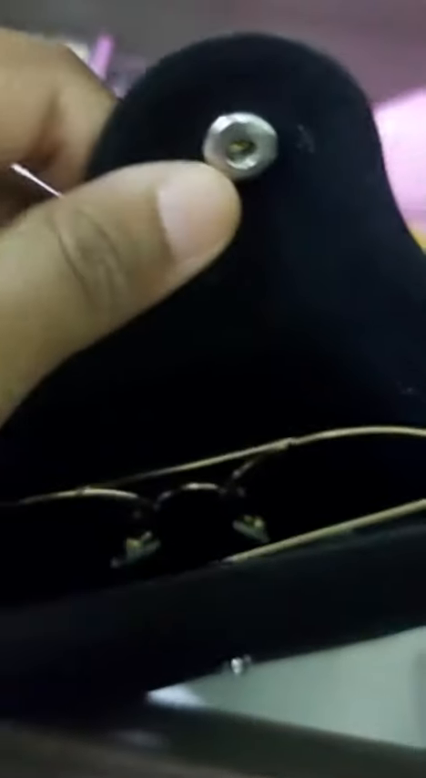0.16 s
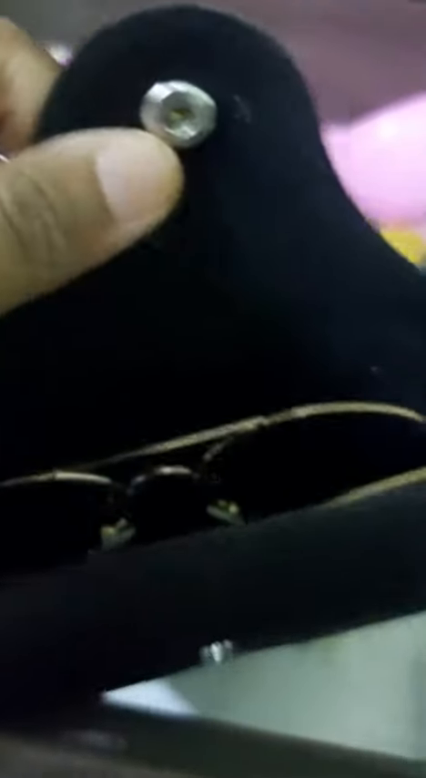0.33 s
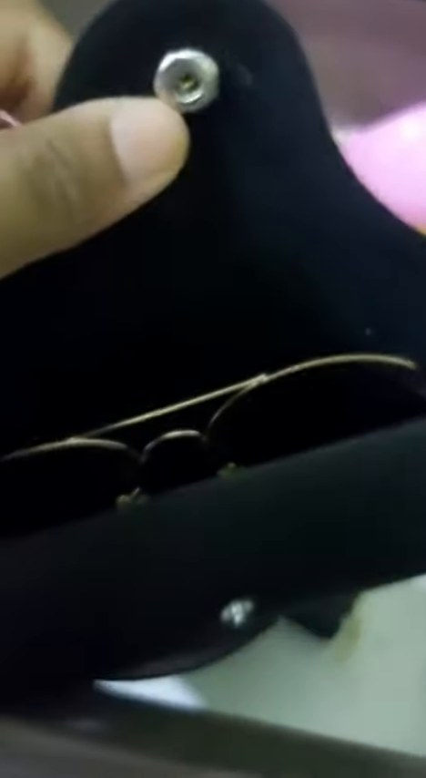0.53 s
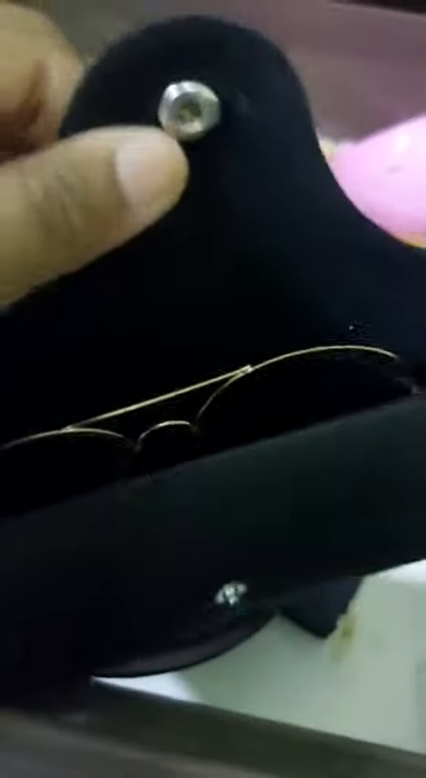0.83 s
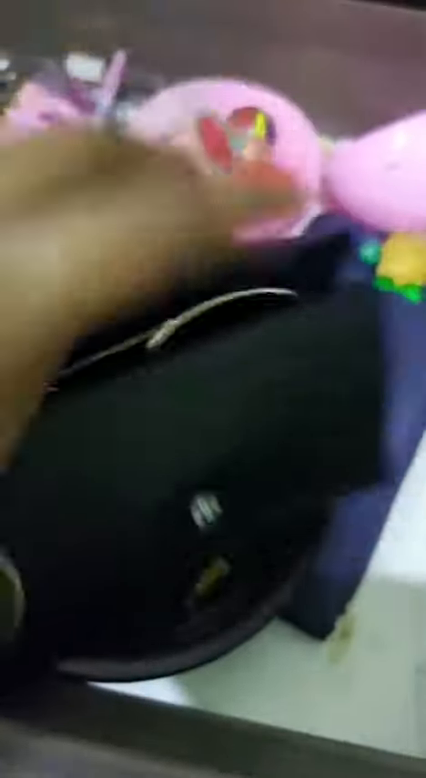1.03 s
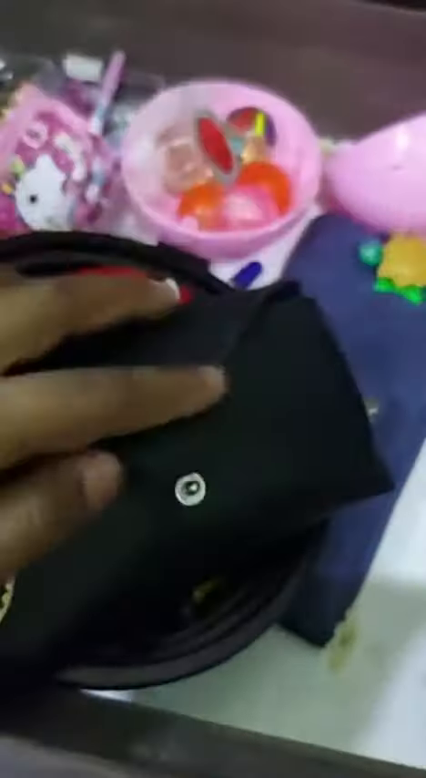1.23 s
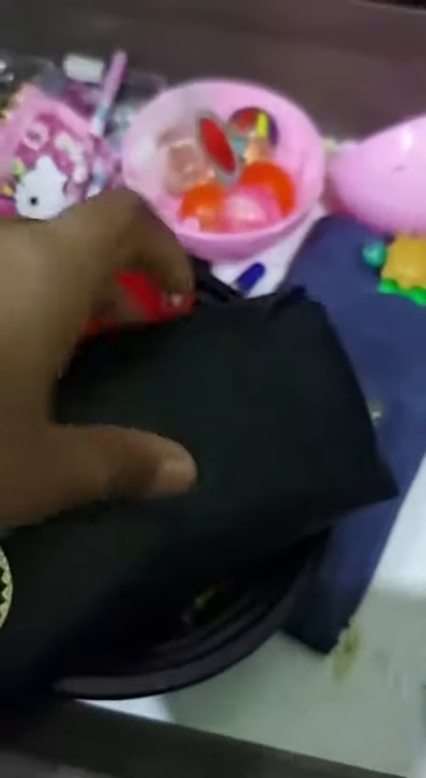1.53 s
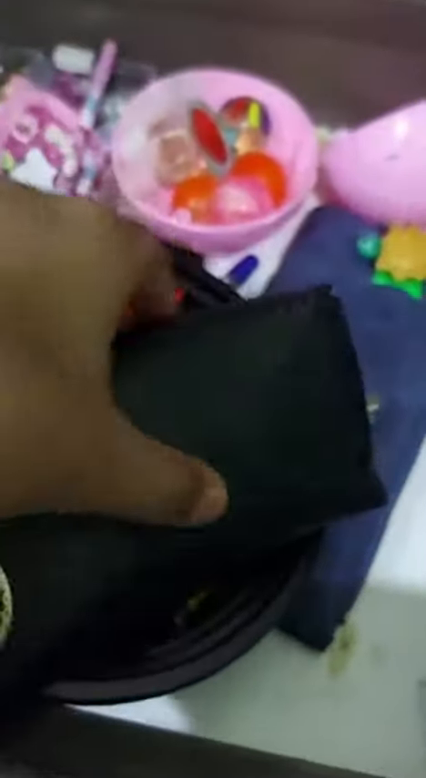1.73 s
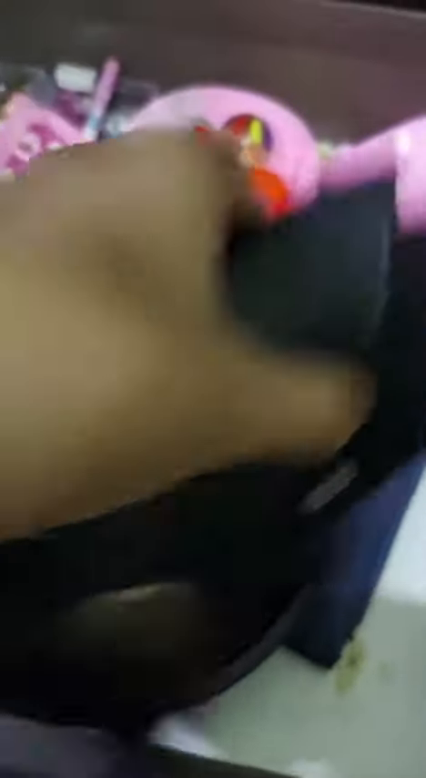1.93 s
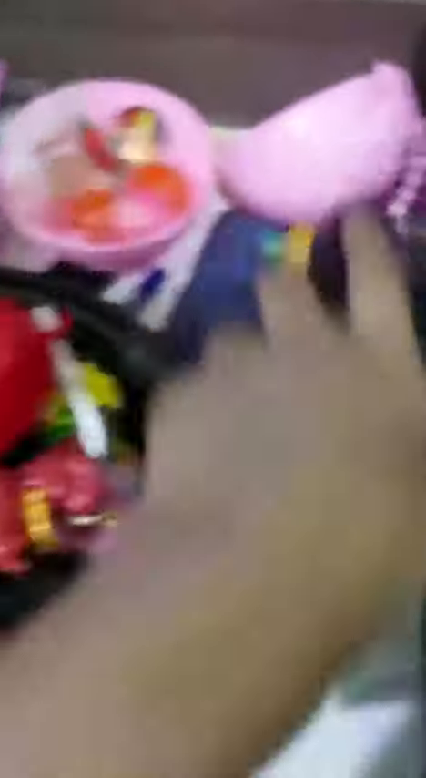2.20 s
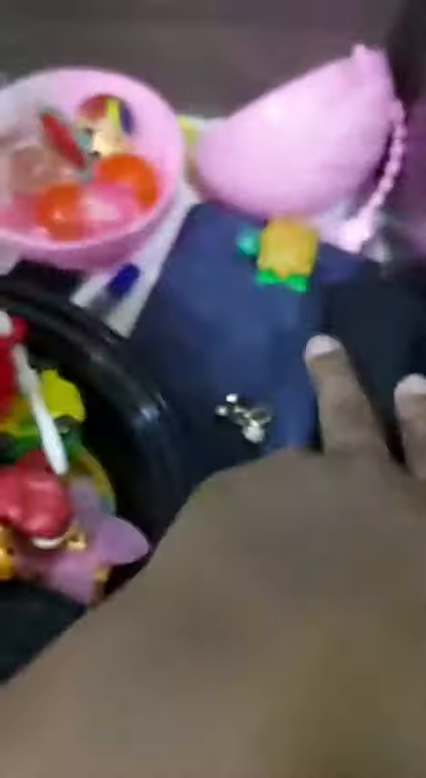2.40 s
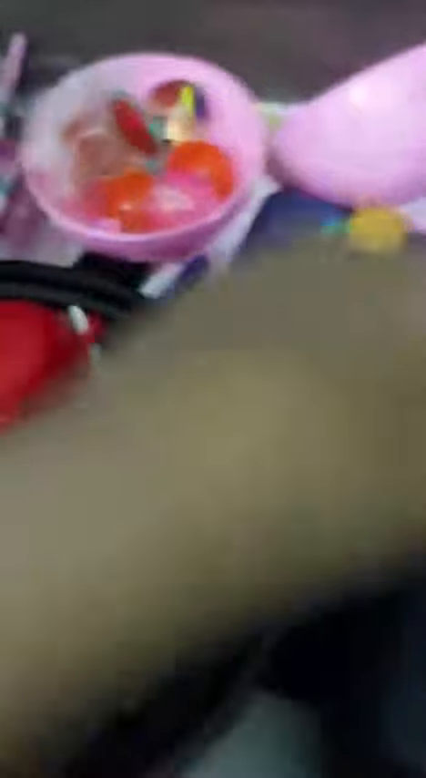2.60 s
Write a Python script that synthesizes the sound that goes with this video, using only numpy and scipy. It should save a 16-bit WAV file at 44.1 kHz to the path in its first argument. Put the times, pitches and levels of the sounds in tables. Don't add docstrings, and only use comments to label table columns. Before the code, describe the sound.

Close handling of a hard case: quiet start, clustered clicks and a thin ting, sparse taps, plastic ticks and rubbing, then a hard double thud on a shelf with brief rattle, over dull room noise and faint hum.

```python
import sys
import numpy as np
from scipy import signal
from scipy.fft import rfft, irfft
from scipy.io import wavfile
from scipy.ndimage import uniform_filter1d

SR = 44100
rng = np.random.default_rng(int(sys.argv[2]) if len(sys.argv) > 2 else 0)


def convert_level_to_amplitude(level_db):
    exponent = np.asarray(level_db, float) / 20
    return 10 ** exponent


def dump_mix(stems):
    frames = np.atleast_2d(stems).T
    limited = np.clip(frames, -1, 1)
    pcm = np.round(limited * 32767).astype(np.int16)
    wavfile.write(sys.argv[1], SR, pcm)


N = 121275


def level(x, db):
    return x * convert_level_to_amplitude(db) / np.sqrt(np.mean(x ** 2))


def walk(rate_hz):
    k = int(SR / rate_hz)
    steps = np.repeat(rng.standard_normal(N // k + 1), k)
    return 1.9 * uniform_filter1d(uniform_filter1d(steps, k), k)[:N]


def colour(x, points):
    octaves = np.log2(np.fft.rfftfreq(N, 1 / SR) + 1)
    hz, db = np.array(points).T
    point_octaves = np.log2(hz)
    gain_db = np.interp(octaves, point_octaves, db)
    gain_db = gain_db - 18 * np.maximum(point_octaves[0] - octaves, 0)
    return irfft(rfft(x) * convert_level_to_amplitude(gain_db), N)


# pitch in Hz, level in dB rms, unsteadiness (0 is steady).
HUM_TONES = [(46.8, -52.5, 0.028), (95.7, -56.5, 0.11), (129, -62.5, 0.24)]
# time in seconds, change of the overtones in dB.
HUM_LOAD = [(0, -9), (.5, -1.5), (.9, 2), (1.9, 4), (2.75, -3)]


def machine_hum(t):
    load_db = np.interp(t, *np.array(HUM_LOAD).T)
    hum = 0
    for hz, db, unsteady in HUM_TONES:
        tone_db = db + 12 * unsteady * walk(4.7)
        if hz > HUM_TONES[0][0]:
            tone_db = tone_db + load_db
        phase = 2 * np.pi * hz * t + 3 * unsteady * walk(14)
        hum = hum + np.sqrt(2) * convert_level_to_amplitude(tone_db) * np.sin(phase)
    return hum * np.array([[1.03], [.97]])


# frequency in Hz, level in dB per Hz.
AIR_COLOUR = [(30, -34), (75, -1), (160, -9), (290, -5), (450, -14.5), (900, -30), (2000, -41),
              (5000, -64.5)]


def room_noise():
    alike_hz = 540
    air = 0
    for hz in 35 * 2 ** np.arange(0, 8, .5):
        band = signal.butter(2, [hz / 1.188, hz * 1.125], "band", fs=SR, output="sos")
        mid, side = signal.sosfilt(band, colour(rng.standard_normal((2, N)), AIR_COLOUR))
        difference = np.clip(hz / alike_hz, .08, 1) * side * np.array([[1], [-1]])
        air = air + convert_level_to_amplitude(0.96 * walk(5.81)) * (mid + difference)
    return level(air, -53)


# frequency in Hz, level in dB per Hz.
HISS_COLOUR = [(3000, -20), (6500, -24), (9000, 3.5), (12000, 9), (15000, 0), (16500, -26)]


def microphone_hiss():
    return level(colour(rng.standard_normal((2, N)), HISS_COLOUR), -80) * convert_level_to_amplitude(.8 * walk(3))


# time in seconds, rub level in dB, share of sleeve from 0 to 1,
# left minus right level of the case in dB.
HANDLING = [(.88, -78.5, 1, 7), (.955, -69, 0.23, 6), (1.12, -59.5, 0.3, 8.5), (1.18, -45.5, .2, 2),
            (1.3, -69.5, 0.03, 4), (1.42, -74.5, .25, 16), (1.5, -62.5, 0.22, 10.5), (1.62, -60.5, 0.4, 7),
            (1.72, -65.5, 0.37, 1.5), (1.8, -53.5, 0.04, 6), (1.92, -55.5, 0.02, 0), (1.99, -61, 0.5, 1),
            (2.13, -69, 0.32, 0), (2.26, -50.5, 0.38, 9.5), (2.36, -49, 0.74, 5), (2.47, -62, .3, 0.5),
            (2.6, -58.5, 0.84, -0.5), (2.75, -62.5, 1, -4)]
# frequency in Hz, level in dB per Hz.
FINGER_COLOUR = [(400, -2.5), (900, -2.5), (1600, -9.5), (2500, -13), (3500, -12), (5000, -19),
                 (16000, -25)]
# frequency in Hz, level in dB per Hz.
SLEEVE_COLOUR = [(3800, -1), (9000, -2), (16000, 2)]


def rubbing(t):
    s, rub_db, sleeve_share, pan_db = np.array(HANDLING).T
    grit_per_s, grit_spread_db, grit_db = 2000, 2.5, -6.5
    grains = rng.random(N) < grit_per_s / SR
    grit = grains * convert_level_to_amplitude(grit_spread_db * rng.exponential(size=N)) * rng.standard_normal(N)
    grit = level(signal.lfilter([1], [1, -.6], grit), grit_db)
    friction = rng.standard_normal((2, N))
    drag_db = 1.2 * walk(25) + 1.5 * walk(90)
    fingers = level(colour(friction + grit, FINGER_COLOUR), 0) * convert_level_to_amplitude(drag_db)
    sleeve = level(colour(friction, SLEEVE_COLOUR), 0)
    share = np.clip(np.interp(t, s, sleeve_share), 0, 1)
    rub = (1 - share) * fingers + share * sleeve
    pan = np.interp(t, s, pan_db) * np.array([[.5], [-.5]])
    return rub * convert_level_to_amplitude(np.interp(t, s, rub_db) + pan)


def contact_push(f, contact_ms):
    ratio = f * contact_ms / 500
    return ratio / (1 + ratio ** 2)


def ringing(modes, contact_ms, spot_hz, pan_db, t):
    scatter_db, detune, far_port_rad, shadow_hz = 3.5, 0.015, 1, 320
    spot_db, spot_octaves = 8, 0.24
    hz, db, t60 = np.array(modes).T[:, :, None]
    chance = rng.standard_normal((4, len(modes), 1))
    favour_db = spot_db * np.exp(-(np.log2(hz / spot_hz) / spot_octaves) ** 2)
    strength = convert_level_to_amplitude(db + scatter_db * chance[0] + favour_db) * contact_push(hz, contact_ms) ** 6.7
    fading = strength * np.exp(-np.log(1000) * t / t60)
    phase = 2 * np.pi * hz * (1 + detune * chance[1]) * t
    near = fading * np.sin(phase)
    far_gain = convert_level_to_amplitude(scatter_db * chance[2] - pan_db * np.minimum(hz / shadow_hz, 1))
    far_phase = phase + far_port_rad * chance[3] * np.minimum(hz / 800, 1.5)
    far = fading * far_gain * np.sin(far_phase)
    ring = np.array([near.sum(0), far.sum(0)])
    return ring / np.abs(ring[0]).max()


def strikes(events, modes, crack_db):
    crack_s, rattle_s, rattle_db = .003, 0.013, -12.5
    port_lag_s, bass_cut_hz = .00008, 110
    size = 4096
    out, t = np.zeros((2, N + SR)), np.arange(int(.25 * SR)) / SR
    start_t = t[:size]
    crack_hz = np.fft.rfftfreq(size, 1 / SR)
    crack_fade = np.exp(-start_t / crack_s) + convert_level_to_amplitude(rattle_db) * np.exp(-start_t / rattle_s)
    pan_curve = np.array(HANDLING)
    for s, peak_db, contact_ms, chatter_ms, spot_hz in events:
        pan_db = np.interp(s, pan_curve[:, 0], pan_curve[:, 3])
        sound = ringing(modes, contact_ms, spot_hz, pan_db, t)
        noise = rng.standard_normal((4, size))
        crack = noise[0] + 1.9 * noise[1:3]
        crack = irfft(rfft(crack) * contact_push(crack_hz, contact_ms) ** 1.94)
        sound[:, :size] += level(crack, crack_db) * convert_level_to_amplitude(np.array([[0], [-pan_db]])) * crack_fade
        chatter_fade = np.exp(-start_t * 1000 / chatter_ms)
        push = 0.28 * noise[3] ** 3 / np.sqrt(15 + chatter_ms * 4) * chatter_fade
        push[0] = -1
        y = signal.fftconvolve(sound, push[None])
        y *= convert_level_to_amplitude(peak_db + pan_db / 2) / np.abs(y[0]).max()
        for port in range(2):
            i = int((s + port * port_lag_s) * SR)
            out[port, i:i + y.shape[1]] += y[port]
    return signal.lfilter(*signal.butter(2, bass_cut_hz, "high", fs=SR), out[:, :N])


# pitch in Hz, level in dB, time to fade by 60 dB in seconds.
SHELL_MODES = [(430, -5, .06), (614, -20, .06), (764, 4, 0.034), (934, -7, 0.02), (1174, -3, 0.037),
               (1295, -4.5, 0.05), (1470, 1, 0.021), (1560, -12, .025), (1953, -3.5, 0.044),
               (2164, 1.5, .025), (2490, -4, 0.013), (3000, 0, 0.018), (3750, -2, .012)]
# start in seconds, peak level in dB, contact length in ms,
# chatter length in ms, pitch in Hz favoured by the spot struck.
SHELL_KNOCKS = [(1.134, -24, 0.45, 1.1, 1500), (1.139, -22, 0.35, 0.75, 1200),
                (1.144, -30.5, 0.54, 1.7, 1200), (1.153, -29.5, 0.18, 2.6, 3700),
                (1.181, -29, 0.43, 2.5, 1520), (1.21, -34, 0.49, 5, 1460), (1.318, -40.5, 0.28, 0.36, 3000),
                (1.483, -45, 0.52, 9, 1190), (1.503, -42, 0.82, 4.1, 1190), (1.561, -42.5, 0.3, 2, 2300),
                (1.575, -44, 0.54, 6, 800), (1.624, -56, 0.23, 1.6, 2200), (1.6392, -21.5, 0.44, 0.31, 764),
                (1.7873, -25, 0.52, 3, 1160), (1.7915, -23, 0.25, 0.66, 1860),
                (1.795, -23, 0.63, 0.74, 1220), (1.8, -33, 0.48, 0.82, 764), (1.811, -33, 0.19, 2.3, 3700),
                (2.0545, -47, 0.84, 1.8, 1300), (2.1824, -28.5, 0.36, 2, 880),
                (2.189, -37.5, 0.49, 2.5, 2500), (2.2482, -26, 0.57, 2.6, 764),
                (2.272, -26, 0.36, 14, 2500), (2.2857, -9, 0.71, 0.59, 764), (2.291, -12, 0.26, 8, 2230),
                (2.301, -18.5, .4, 8, 1160), (2.3568, -17.5, 0.33, 0.88, 2230),
                (2.3585, -18.5, 0.86, 0.37, 740), (2.368, -36, 0.96, 3, 614), (2.565, -54, 0.46, 3, 800)]


def shell_knocks():
    return strikes(SHELL_KNOCKS, SHELL_MODES, -10)


# pitch in Hz, level in dB, time to fade by 60 dB in seconds.
TRINKET_MODES = [(2470, -18, 0.008), (2950, -4, .012), (3320, -2, 0.014), (3764, 0, 0.015),
                 (4160, -4, 0.02), (4560, -3, 0.025), (4800, -2, .025), (5300, -4, 0.02), (5720, -1, 0.025),
                 (6450, -5, 0.018), (8600, -8, .012), (10200, -15, .01)]
# start in seconds, peak level in dB, contact length in ms,
# chatter length in ms, pitch in Hz favoured by the spot struck.
TRINKET_TICKS = [(1.134, -30.5, 0.036, 6, 5400), (1.157, -33, 0.1, 4.1, 4600),
                 (1.171, -30, 0.21, 2.5, 5500), (1.195, -36, 0.23, 3, 4600), (1.2002, -14.5, 0.1, 1, 5400),
                 (1.209, -28, 0.28, 5, 5500), (1.221, -38, 0.29, 6, 4600), (1.24, -49, 0.27, 14, 4600),
                 (1.49, -49, 0.088, 9, 6400), (1.565, -51, 0.13, 3, 4340), (1.838, -45.5, 0.21, 8, 3700),
                 (1.877, -38.5, 0.24, 4, 4600), (1.891, -40, 0.22, 5, 2950),
                 (1.9195, -32.5, 0.16, 1.5, 4500), (1.927, -39, 0.17, 3, 4600),
                 (2.257, -34.5, 0.1, 8, 5500), (2.288, -21, 0.08, 8, 4600), (2.321, -22, 0.23, 4, 3680),
                 (2.33, -23, 0.13, 4, 4600), (2.341, -33, 0.21, 4, 4100), (2.36, -28, 0.2, 4, 3680),
                 (2.393, -42.5, 0.22, 3.4, 6400), (2.444, -37, 0.12, 4, 5470),
                 (2.597, -47.5, 0.12, 4, 3770), (1.6394, -29, 0.16, 0.53, 3040)]


def trinket_ticks():
    return strikes(TRINKET_TICKS, TRINKET_MODES, -11)


# pitch in Hz, level in dB, time to fade by 60 dB in seconds.
SHELF_MODES = [(86, -9.5, 0.2), (118.7, -8, .15), (162.8, -8, 0.18), (212, -22, .1), (263, -18, 0.22),
               (326.3, -2, 0.12), (367, -16.5, .06), (426, 5.5, 0.041), (502, -16.5, 0.082),
               (591.7, -3, 0.074), (641, -2.5, 0.036), (700, -4, .05), (770, -12, .04), (823, -14.5, .05)]
# start in seconds, peak level in dB, contact length in ms,
# chatter length in ms, pitch in Hz favoured by the spot struck.
SHELF_THUDS = [(1.142, -29.5, 3.2, 4.5, 320), (1.16, -35, 4.1, 2.4, 120), (1.182, -37, 2.7, 6.3, 200),
               (1.24, -41.5, 1.74, 3.1, 150), (1.318, -41, 0.9, .5, 397), (1.7915, -26.5, 1.8, 0.88, 413),
               (1.812, -37, 3, 2.2, 280), (2.249, -31.5, 2, 5.2, 300), (2.2855, -4, 1.11, 0.56, 650),
               (2.2926, -4, 1.27, 1.7, 419), (2.307, -14.5, 1.2, 2.4, 565), (2.321, -18, 2.54, 8.3, 430),
               (2.333, -28.5, 3.8, 3, 450), (2.366, -29.5, 1.1, 2.7, 300)]


def shelf_thuds():
    return strikes(SHELF_THUDS, SHELF_MODES, -12)


# pitch in Hz, level in dB, time to fade by 60 dB in seconds.
STUD_MODES = [(3250, -3, .025), (3380, 0, .04), (3540, -2, .035), (3710, -9, .03)]
# start in seconds, peak level in dB, contact length in ms,
# chatter length in ms, pitch in Hz favoured by the spot struck.
STUD_JINGLES = [
    (1.2005, -22, .15, 1.5, 3320),
    (1.222, -40, .15, 6, 3500),
    (1.243, -44, .15, 8, 3350),
    (1.264, -46, .15, 5.3, 3350),
    (1.284, -47.5, .15, 8, 3400),
    (1.3, -48, .15, 5, 3350),
    (2.265, -36.5, .15, 3.2, 3500),
    (2.45, -36, .15, 4, 3230),
    (2.47, -60, .15, 6.9, 3600),
]


def stud_jingles():
    return strikes(STUD_JINGLES, STUD_MODES, -25)


def room(x):
    t60_s, tail_db, top_hz, gap_s = 0.31, -14, 5300, 0.0034
    t = np.arange(int(.5 * SR)) / SR
    tail = rng.standard_normal((2, len(t))) * np.exp(-np.log(1000) * t / t60_s)
    tail = tail * np.clip(t / gap_s - 1, 0, 1)
    tail = signal.lfilter(*signal.butter(1, top_hz, fs=SR), tail)
    tail = tail * convert_level_to_amplitude(tail_db) / np.sqrt((tail ** 2).sum(1, keepdims=True))
    return signal.fftconvolve(x.mean(0)[None], tail)[:, :N]


def scene():
    t = np.arange(N) / SR
    background = machine_hum(t) + room_noise() + microphone_hiss()
    rub = rubbing(t)
    hits = shelf_thuds() + shell_knocks() + trinket_ticks() + stud_jingles()
    close = hits + rub
    return close + room(close) + background


def low_pass(x):
    return signal.sosfilt(signal.butter(12, 16650, fs=SR, output="sos"), x)


def record(dry):
    squash, top_hz = 1.02, 15900
    rounded = np.tanh(dry * squash) / squash
    top_cut = signal.ellip(8, .2, 70, top_hz, fs=SR, output="sos")
    mix = signal.sosfilt(top_cut, rounded)
    return low_pass(mix)


dry = scene()
out = record(dry)
dump_mix(out)
```